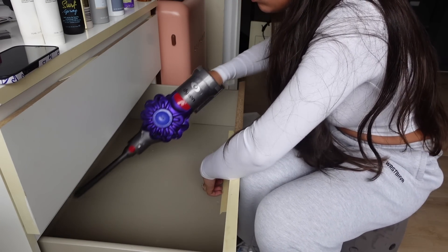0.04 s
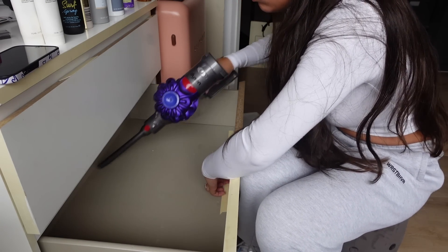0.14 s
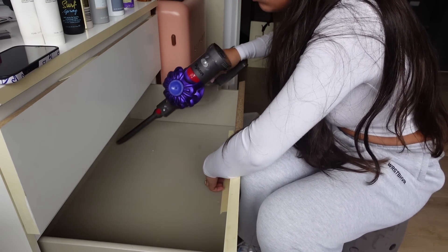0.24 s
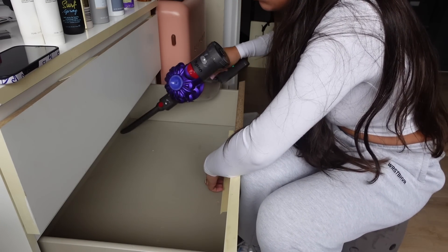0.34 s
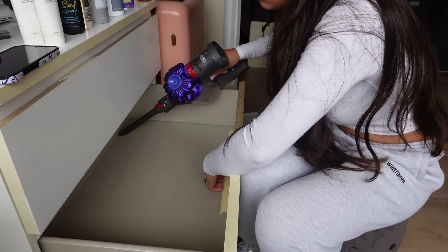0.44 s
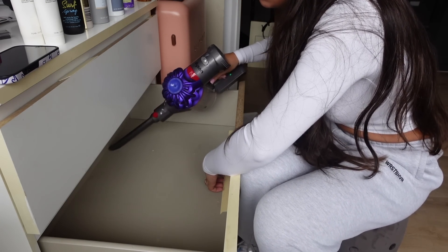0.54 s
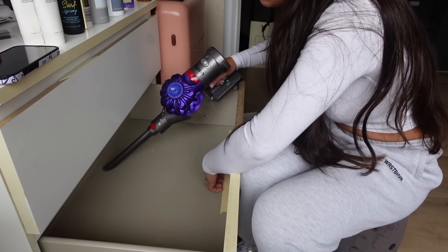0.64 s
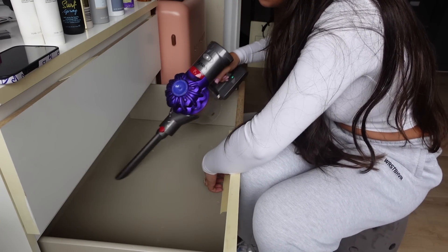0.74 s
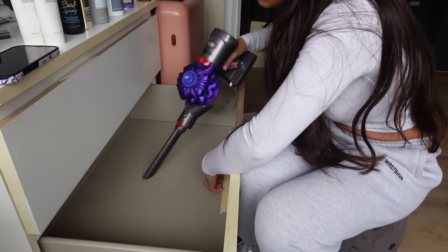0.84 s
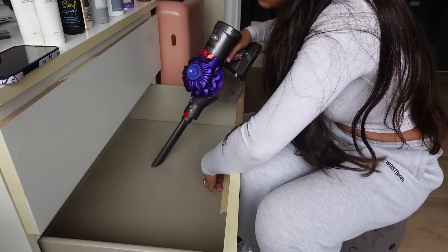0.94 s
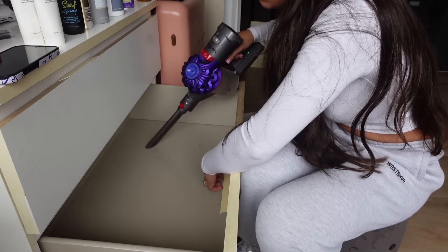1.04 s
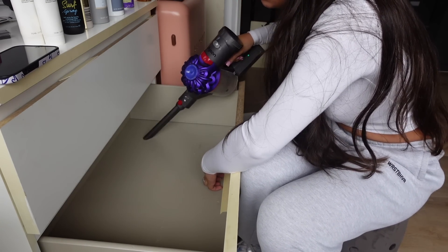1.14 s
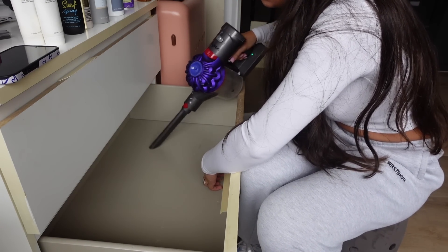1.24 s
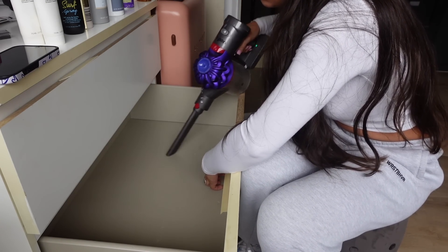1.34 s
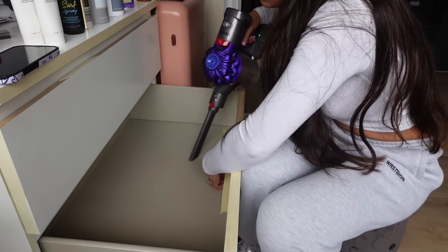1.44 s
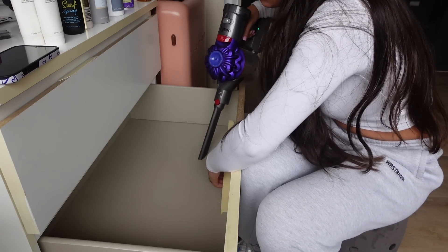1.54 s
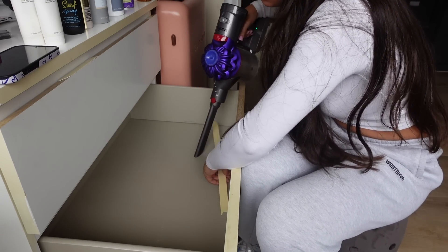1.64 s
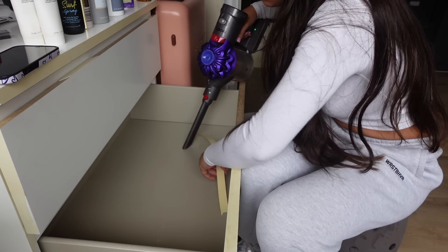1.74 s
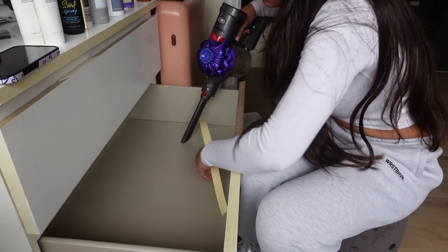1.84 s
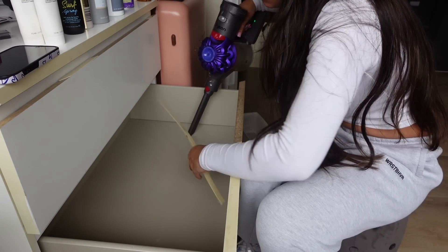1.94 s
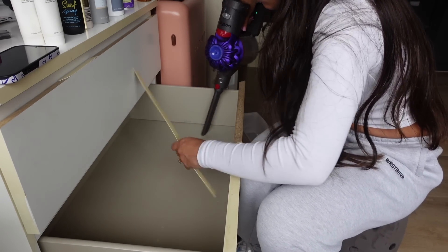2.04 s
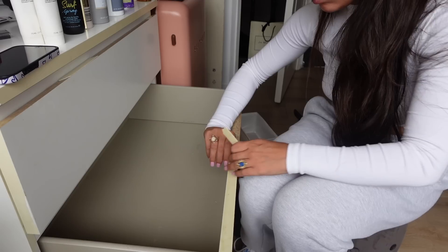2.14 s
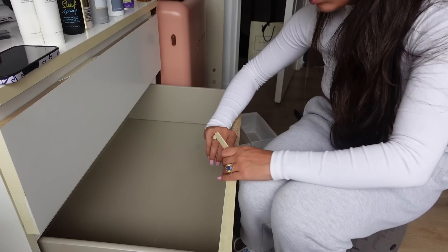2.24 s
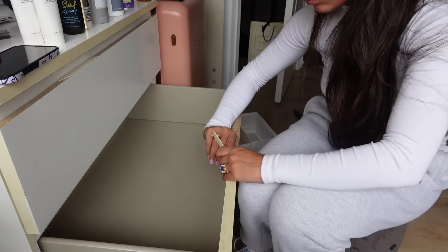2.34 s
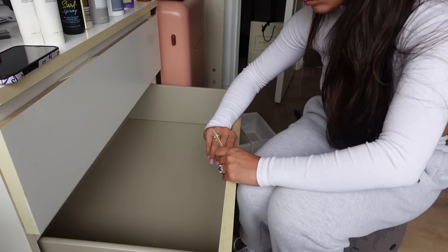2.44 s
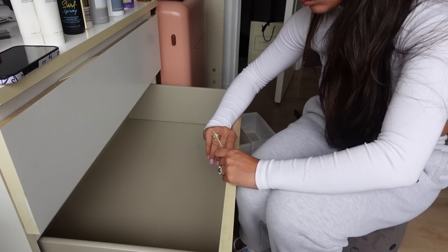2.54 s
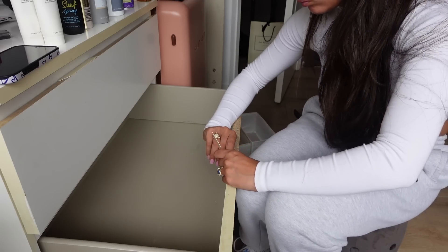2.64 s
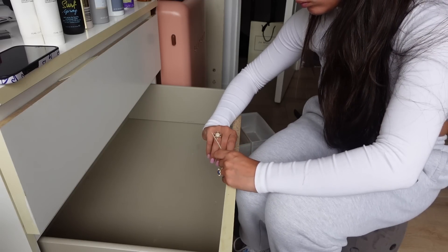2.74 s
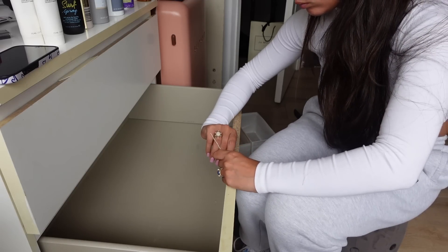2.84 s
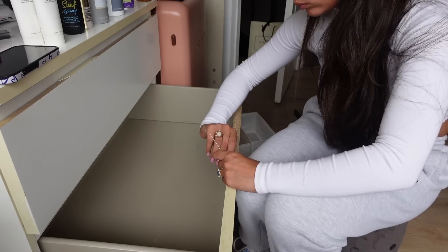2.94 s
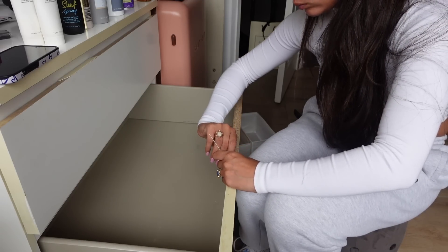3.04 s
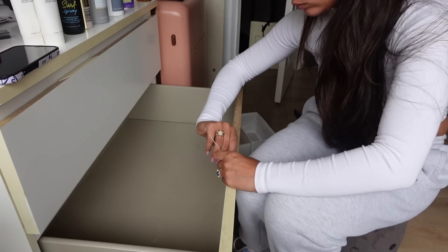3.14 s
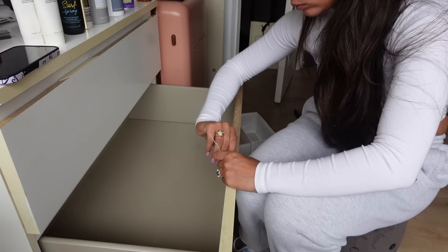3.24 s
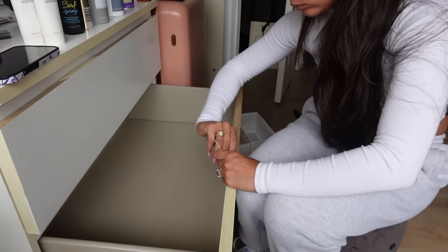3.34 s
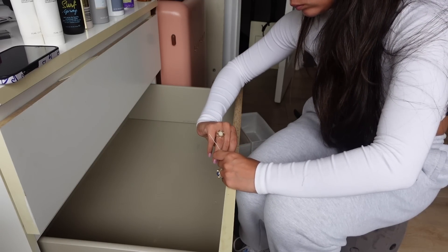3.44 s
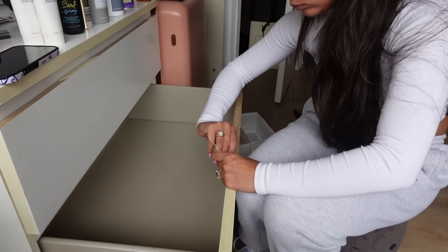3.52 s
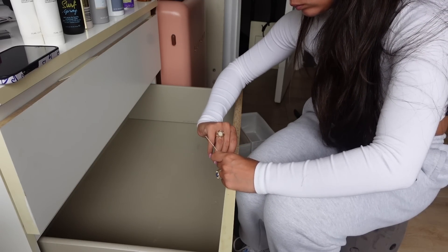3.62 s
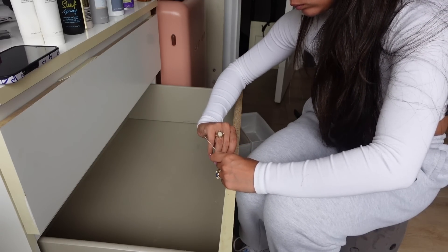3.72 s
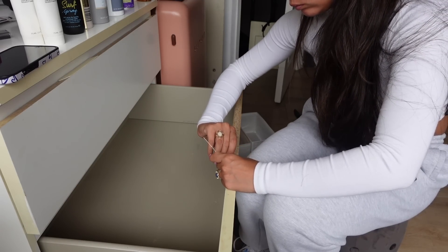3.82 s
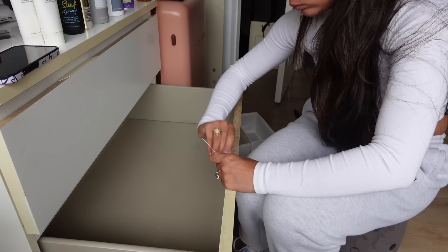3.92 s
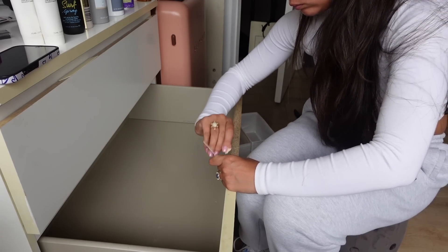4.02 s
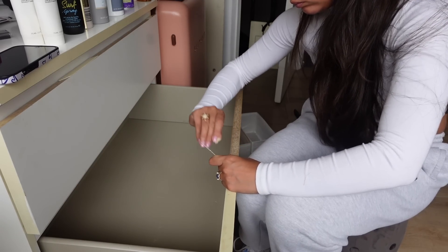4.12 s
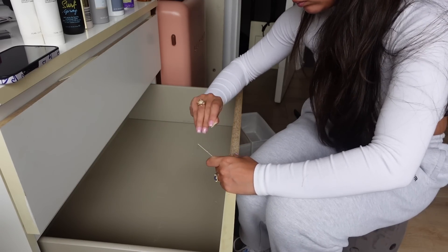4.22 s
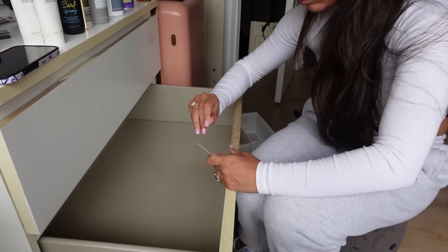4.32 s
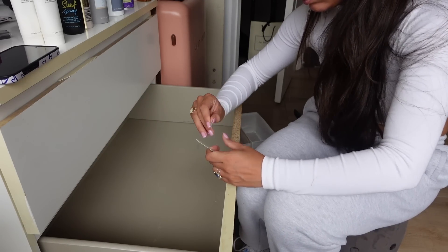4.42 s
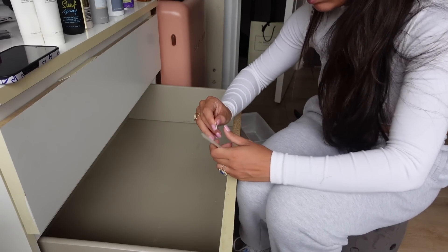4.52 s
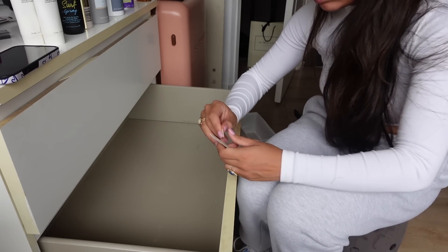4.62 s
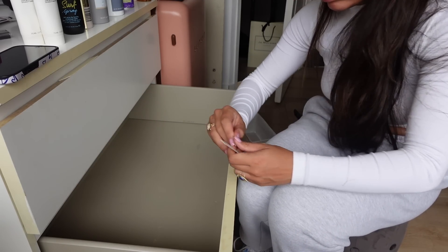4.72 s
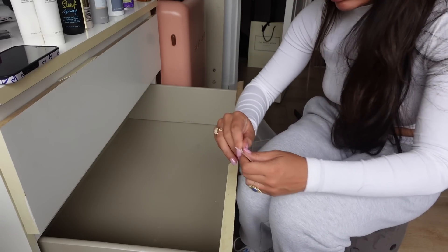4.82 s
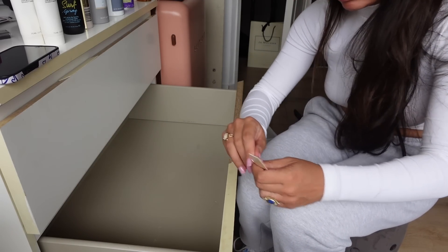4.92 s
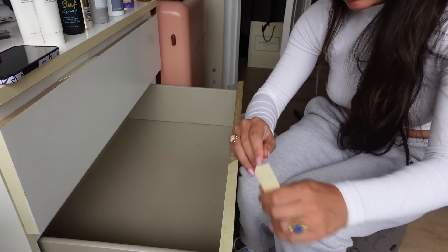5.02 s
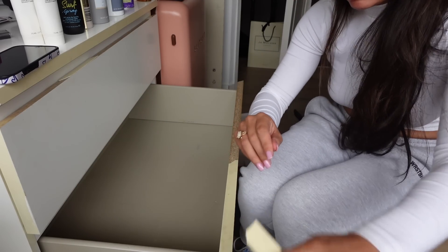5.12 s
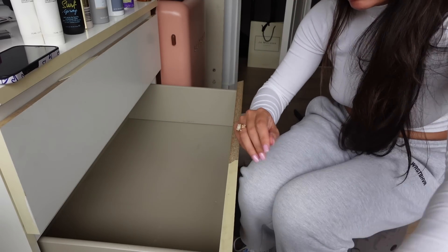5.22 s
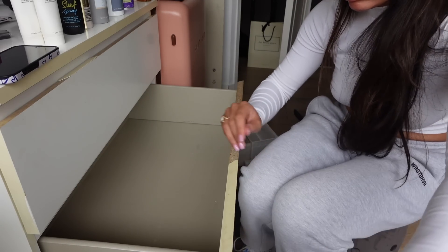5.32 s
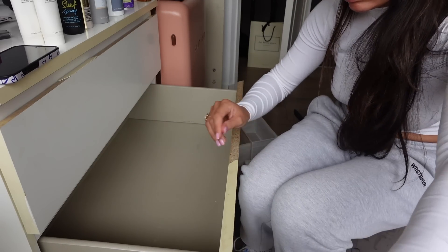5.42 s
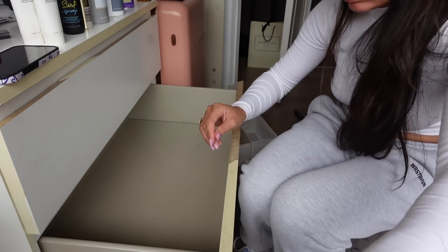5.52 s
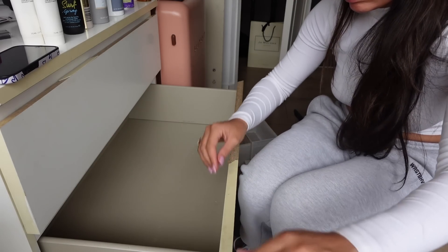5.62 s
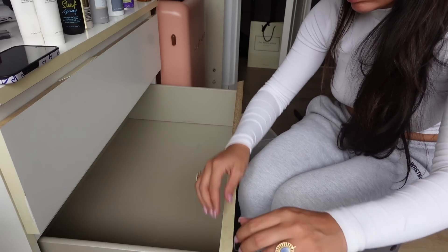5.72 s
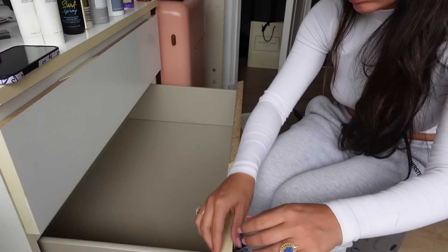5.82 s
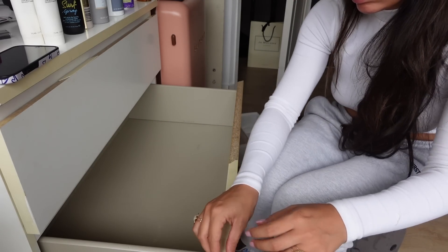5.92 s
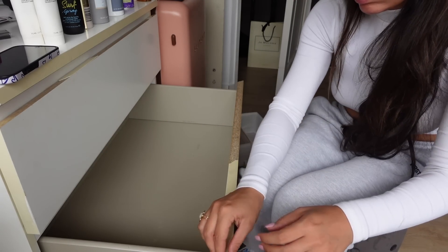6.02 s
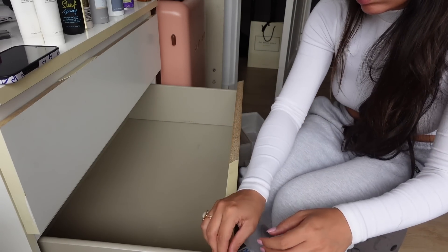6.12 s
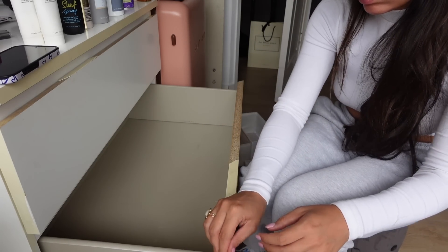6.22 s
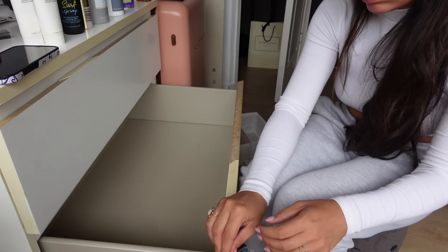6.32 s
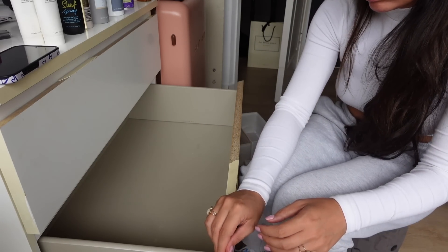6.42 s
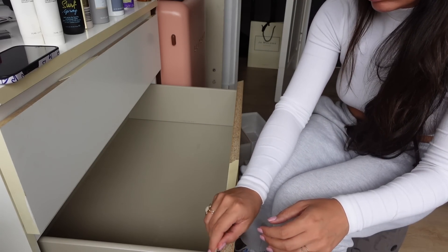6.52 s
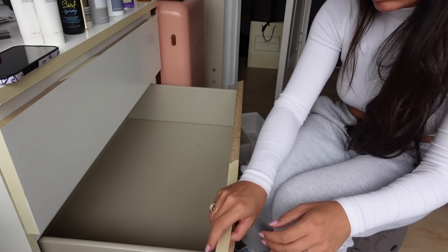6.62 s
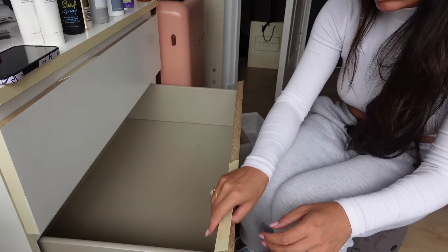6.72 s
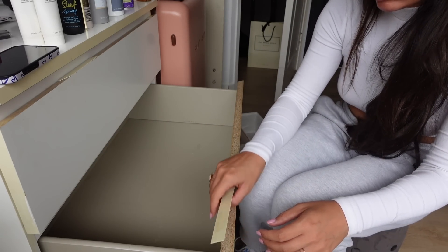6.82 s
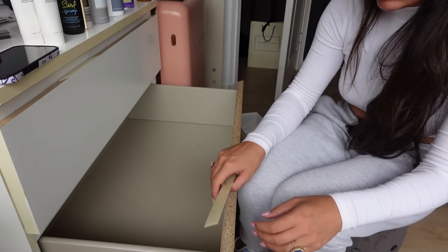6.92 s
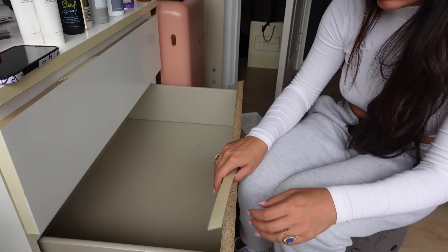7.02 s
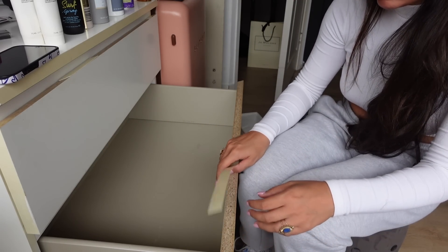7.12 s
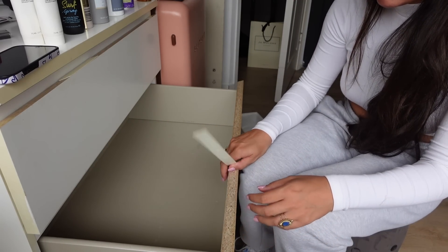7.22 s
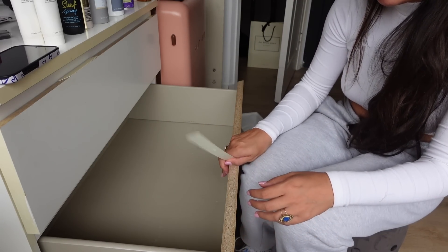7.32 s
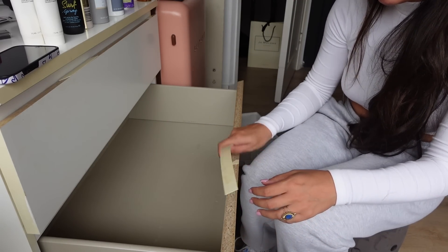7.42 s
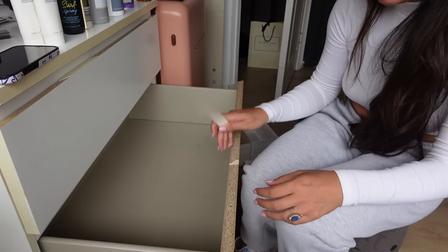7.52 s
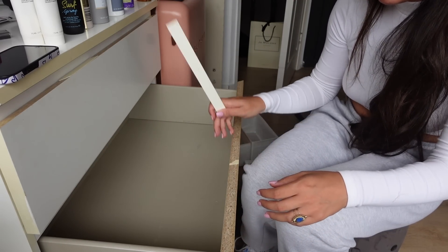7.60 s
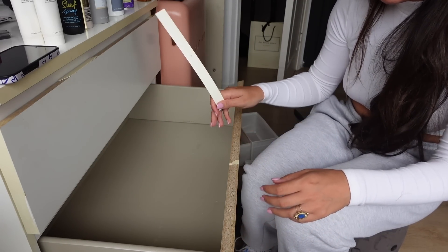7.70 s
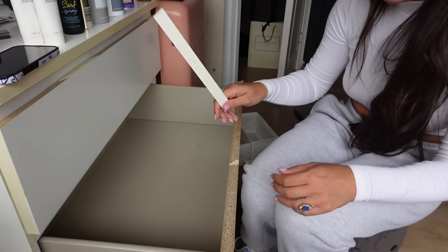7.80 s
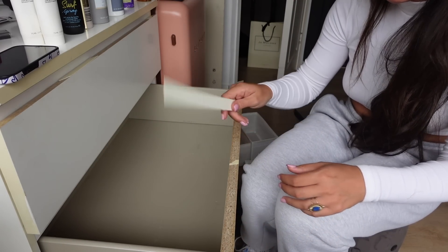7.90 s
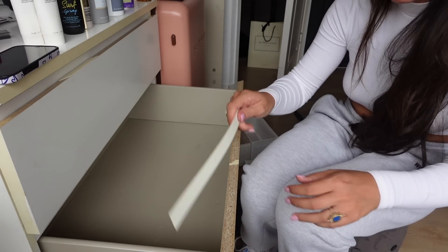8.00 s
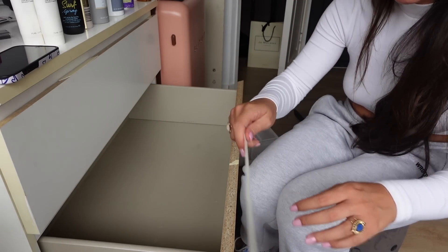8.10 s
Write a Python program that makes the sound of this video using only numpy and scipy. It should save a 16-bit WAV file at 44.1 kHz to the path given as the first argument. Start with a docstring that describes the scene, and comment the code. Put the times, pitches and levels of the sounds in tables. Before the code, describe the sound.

In a small room, a cordless vacuum runs loudly inside a drawer, rushing air under a high motor whine, with a few dull nozzle bumps. It cuts off abruptly after two seconds, leaving a soft hum. Close by, fingernails tap and pick at a plastic edge strip, the glue ticking until it snaps. Hands tap the board and sleeves rustle, then a second length peels with a brief hiss and rips free with sharp cracks.

```python
"""In a small, softly humming room, a cordless vacuum cleaner sweeps a drawer with its crevice nozzle. Its fast
motor whines over turbulent air that excites the ducts' resonances; its sound ends abruptly at 2.1 s. Then
fingernails pick at the drawer's plastic edge strip: the glue ticks, the strip snaps, hands tap and rub the
board, and a second length peels with a hiss and rips free. Each impact or slip is a force filtered by the body
it excites, then reflected by the drawer and the room."""
import sys
import numpy as np
from scipy import signal
from scipy.fft import rfft, irfft, next_fast_len
from scipy.io import wavfile
from scipy.ndimage import map_coordinates

SR = 44100
rng = np.random.default_rng(int(sys.argv[2]) if len(sys.argv) > 2 else 0)


def put_to_file(sound):
    """Save the sound as 16-bit audio at rate SR, in the file named by the first command-line argument."""
    columns = np.atleast_2d(sound).T  # one column per channel
    safe = np.clip(columns, -1, 1)
    whole_steps = np.round(safe * 32767)
    wavfile.write(sys.argv[1], SR, whole_steps.astype(np.int16))


N = 359856
TIME = np.arange(N) / SR

# Resonances of the wand and bin. Each row: centre in Hz, width in Hz, gain in dB.
DUCT_MODES = [(376, 20, 1), (572, 23, 7.5), (790, 32, 9), (1049.4, 130, 9.5), (2420, 90, 0.5),
              (2760, 65, 3.5), (4190, 610, 2.5), (6280, 330, 3.5), (8000, 400, 3)]
# Stereo width of the background. Each row: frequency in Hz, side level in dB.
BACKGROUND_WIDTH = [(100, -3.5), (4500, -7), (15000, -22)]


def vacuum(cut_s=2.1, bump_t60=.5):
    """Resonance: turbulent air excites the ducts and nozzle gap; bumps make the drawer boom."""
    # Spectra of air stream, drawer boom and bottom panel. Each row: frequency in Hz, relative dB.
    air_spectrum = [(290, -43.5), (500, -11.5), (800, -10.5), (1050, -15), (1500, -5), (2360, 0.5),
                    (3200, -2), (6500, -7), (8200, -9.5), (9600, -15), (10800, -8), (12500, -15.5),
                    (14500, -21), (16000, -27)]
    boom_spectrum = [(25, -35), (110, -33), (145, -11), (180, -22.5), (205, 1), (310, -0.5), (365, 4.5),
                     (470, -5), (800, -21), (2000, -59)]
    panel_spectrum = [(25, -20), (100, -12), (145, 2), (175, -11.5), (210, -4.5), (400, -11), (2000, -64)]
    # Stereo width. Each row: frequency in Hz, side level in dB.
    width = [(60, -31.5), (110, -27), (200, -17), (380, -19), (700, -21.5), (1290, -34), (2380, -28.5),
             (4400, -36.5), (8120, -32), (15000, -19.5)]
    # Resonances of the nozzle's gap to the board and of the hollow between nozzle and drawer wall.
    # Each row: time in seconds, centre in Hz, level in dB.
    gap_path = [(0, 2260, -22.5), (.47, 2380, -18), (.82, 2500, -24.5), (1.0, 2482, -18),
                (1.15, 2580, -23.5), (1.28, 2520, -18.5), (1.52, 2230, -22.5), (1.68, 2450, -25),
                (1.81, 1980, -15.5), (2.08, 2550, -26.5)]
    hollow_path = [(0, 1000, -25), (.33, 1400, -21), (.46, 1490, -31.5), (.6, 1250, -23.5),
                   (.87, 1350, -31.5), (1.1, 1380, -22.5), (1.25, 1350, -29), (1.83, 1550, -23.5),
                   (1.96, 1398, -36.5), (2.08, 1300, -22)]
    # The nozzle strikes the board. Each row: start in seconds, level in dB.
    bumps = [(.003, -38), (.41, -43), (1.03, -54), (1.3, -47), (1.39, -49), (1.86, -47.5)]
    air = amp(-14.5 + .63 * wobble(25)) * noise(air_spectrum, width, lambda hz: peaks(DUCT_MODES, hz))
    gap = gap_resonance(gap_path, octaves=.19, waver_db=1.96)
    hollow = gap_resonance(hollow_path, octaves=.32, waver_db=1.5)
    shake = sum(amp(db - 60 * np.abs(TIME - s) / bump_t60) * (TIME > s) for s, db in bumps)
    steady_boom = amp(-35 + 1.4 * wobble(5.4))
    boom = np.hypot(steady_boom, amp(13) * shake) * noise(boom_spectrum, width)  # powers add
    thump = shake * noise(panel_spectrum, width)
    sounding = np.clip((cut_s - TIME) * SR / 64, 0, 1)
    return (air + gap + hollow + boom + thump + motor()) * sounding


def motor(blades=7, base_blade_hz=11790):
    """Rotation gives shaft harmonics, a blade-passing tone and rough, inharmonic bearing tones."""
    # The machine turns toward and away. Each row: time in seconds, blade, bearing, shaft level in dB.
    levels = [(0, -25.5, -28.5, -27.5), (.19, -29.5, -29.5, -25), (.48, -23.5, -32.5, -29),
              (.6, -23.5, -28, -38), (.85, -26, -22.5, -35.5), (1.13, -23.5, -26.5, -37.5),
              (1.3, -28.5, -33.5, -36.5), (1.55, -22.5, -29, -38), (1.83, -26, -28, -29),
              (2.08, -30.5, -25.5, -32)]
    # A partly blocked nozzle speeds the motor up.
    # Each row: centre in seconds, width in seconds, rise of the blade tone in Hz.
    surges = [(1.0, .11, 65), (1.66, .14, 30)]
    # Shaft overtones. Each row: multiple of the shaft speed, level in dB.
    harmonics = [(2, -35.5), (3, -34.5), (4, -34.5)]
    # Bearing tones. Each row: multiple of the shaft speed, relative dB, phase jitter in radians.
    bearing_tones = [(6.53, 0, .5), (6.36, -6, 1.5)]

    def tone(phase, flutter_db=2.5):
        """Amplitude modulation: a sine flutters as the machine moves."""
        return unit(np.sin(phase) * amp(flutter_db * wobble(26)))

    blade_db, bearing_db, shaft_db = curves(levels)
    surge_hz = sum(rise * np.exp(-.5 * ((TIME - s) / width) ** 2) for s, width, rise in surges)
    blade_hz = base_blade_hz + surge_hz + 6 * wobble(40)
    angle = 2 * np.pi * np.cumsum(blade_hz) / blades / SR
    shaft = amp(shaft_db) * tone(angle + .5 * wobble(25))
    overtones = sum(amp(db) * tone(k * angle) for k, db in harmonics)
    bearing = sum(amp(db) * tone(k * angle + jitter * wobble(120), flutter_db=4.5)
                  for k, db, jitter in bearing_tones)
    return shaft + overtones + amp(bearing_db) * bearing + amp(blade_db) * tone(blades * angle)


def gap_resonance(path, octaves, waver_db):
    """An air gap's resonance selects a band of noise; it wavers with the hand and passes the ducts."""
    centre_hz, db = curves(path)
    gain = amp(db + waver_db * wobble(14))
    centre_hz = centre_hz * 2 ** (.064 * wobble(14))
    hz, t, white = signal.stft(rng.standard_normal(N), SR, nperseg=2048)
    band = bell(hz[:, None], np.interp(t, TIME, centre_hz), octaves)
    ducts = amp(peaks(DUCT_MODES, hz))[:, None]
    return gain * unit(signal.istft(white * band * ducts, SR, nperseg=2048)[1][:N])


def edge_strip():
    """Fracture: the glue gives way in single cracks, and in rips where a crack runs along it."""
    # Each row: start in seconds, strength in dB, ring in Hz.
    cracks = [(3.0986, -29.5, 7390), (3.1213, -23.5, 6500), (3.1646, -14, 9740), (3.3257, -28.5, 7830),
              (3.4066, -26, 7770), (3.4296, -16, 7920), (3.5433, -24, 7680), (3.6677, -20.5, 8000),
              (3.6889, -22.5, 7000), (3.736, -12.5, 7750), (3.8163, -28, 7360), (3.9505, -6.5, 6340),
              (3.9591, 2, 4350), (4.0248, -10, 4924), (5.4517, -20, 3824), (5.5785, -24.5, 4150),
              (7.1633, 3, 5346), (7.2195, 0, 9130), (7.2924, 6.5, 9380), (7.3136, 6, 6740),
              (7.7188, -29, 4240), (8.0606, -34.5, 4530)]
    # Each row: start and length in seconds, strength in dB, ring in Hz, knock and treble gain in dB.
    rips = [(3.954, .0033, -26, 4500, -4, 0), (3.959, .04, -27.5, 3420, -9, -9.5),
            (4.029, .014, -35, 3490, -6.5, -8.5), (7.293, 0.023, -23, 4820, -16, 2.5),
            (7.312, .059, -25.5, 5570, -20.5, 1.5)]
    out = np.zeros((2, N))
    for s, db, ring_hz in cracks:
        force = contact(t60=.0098, chatter=.61)
        # Harder cracks free the strip, so the board's share falls; they are also brighter.
        crack = strip_response(force, ring_hz, knock_db=-30 - .4 * db, treble_db=-2.5 + .12 * db)
        add(out, s, amp(db) * in_room(crack, wet_db=-2))
    t = np.arange(SR // 8) / SR
    for s, length, db, ring_hz, knock_db, treble_db in rips:
        force = slips(len(t), spiky_db=2) * np.clip(2 * (1 - t / length), 0, 1)
        rip = strip_response(force, ring_hz, knock_db, treble_db)
        add(out, s, amp(db) * np.sqrt(length * SR) * in_room(rip, wet_db=-2.5, drawer_db=-6))
    return out * amp([[.25], [-.25]])  # slightly to the left


def strip_response(force, ring_hz, knock_db, treble_db):
    """Forced vibration: the free length of strip rings broadly and knocks the board it hangs on."""
    # Responses of strip and board. Each row: frequency in Hz, relative dB.
    strip = [(40, -56), (200, -30.5), (1400, -27), (2500, -3), (3300, -5), (5000, 1), (9500, -1.5),
             (13000, -4), (16000, -7.5)]
    board = [(25, -40), (80, -16.5), (230, 2), (450, -2), (750, -1), (1050, 3), (1450, 1), (1900, 5.5),
             (3000, -17.5), (8000, -34), (16000, -49)]
    colour = lambda hz: 8 * bell(hz, ring_hz, octaves=.25) + treble_db * bell(hz, 15000, octaves=.54)
    return coloured(force, strip, colour) + amp(knock_db) * coloured(force, board)


def taps():
    """Impact: a hard nail or ring clicks, and the soft finger behind it thuds on the board."""
    # Each row: start in seconds, strength in dB, resonance in Hz, relative thud in dB.
    strikes = [(2.455, -20, 2780, 0), (2.484, -32.5, 956, -2), (2.612, -26.5, 1940, -26),
               (2.817, -33.5, 1800, -26), (4.096, -22, 619, -4), (4.15, -26, 1910, -20),
               (4.222, -25.5, 2530, -21.5), (5.415, -33.5, 2420, -24), (5.839, -17.5, 920, -30.5),
               (6.049, -33, 2220, -30), (6.27, -24.5, 1710, -24), (6.285, -23, 1710, -25),
               (6.425, -26, 1670, -23.5), (7.555, -31.5, 864, -17)]
    # Spectra of nail and finger impacts. Each row: frequency in Hz, relative dB.
    nail = [(40, -20), (150, -6.5), (500, -5), (950, -0.5), (1800, -1), (3200, -6.5), (6000, -12.5),
            (10000, -23.5), (16000, -30.5)]
    finger = [(60, -49), (150, -10), (240, 1.5), (400, -9), (700, -14), (2000, -41)]
    out = np.zeros((2, N))
    for s, db, ring_hz, thud_db in strikes:
        force = contact(t60=.013, chatter=.83)
        click = coloured(force, nail, lambda hz: 7.2 * bell(hz, ring_hz, octaves=.16))
        thud = amp(thud_db) * coloured(force, finger)
        add(out, s, amp(db) * in_room(click + thud, wet_db=4.5, drawer_db=.5))
    return out


def sleeves():
    """Sliding friction: cloth rubs in strokes that swell quickly and fade slowly."""
    # Each row: start in seconds, length in seconds, level in dB.
    strokes = [(2.55, .4, -74), (4.25, .45, -65.5), (5.3, 0.51, -57), (6.55, .5, -55), (7.4, .85, -64.5)]
    # Spectrum of rubbed cloth. Each row: frequency in Hz, relative dB.
    cloth = [(710, -46), (1200, -15.5), (1570, -1), (2040, -3), (2790, -2), (3080, -6.5), (5300, -4),
             (16000, -22.5)]
    gain = sum(amp(db) * swell(s, .25 * length, s + length, .75 * length) for s, length, db in strokes)
    return friction(gain, cloth, spiky_db=3, uneven_db=3)


def palm(start_s=5.845, length_s=.14, fall_db_per_s=101):
    """Friction noise decays as a palm lands on the board and slows to rest."""
    # Spectrum of skin on the board. Each row: frequency in Hz, relative dB.
    skin = [(120, -52), (200, -40), (353, -9), (646, -18), (719, -2.5), (875, -12), (922, 2), (1010, -8.5),
            (3440, -12.5), (14000, -39)]
    slowing = amp(-43 - fall_db_per_s * np.abs(TIME - start_s))
    touching = swell(start_s, .012, start_s + length_s, .02)
    return friction(slowing * touching, skin, spiky_db=0, uneven_db=4)


def peel(rise_s=.25):
    """Adhesive failure: as the pull on the strip builds, tiny breaks in the glue merge into a hiss."""
    # Each row: start in seconds, end in seconds, level in dB.
    pulls = [(3.05, 3.2, -52.5), (3.277, 3.8, -65), (6.784, 7.29, -49)]
    # Spectrum of parting glue. Each row: frequency in Hz, relative dB.
    glue = [(710, -48.5), (1200, -13.5), (1570, -6.5), (2110, -12), (2480, -6), (4550, -2), (4960, -2.5),
            (14200, -8), (16000, -11.5)]
    gain = sum(amp(db) * swell(start, rise_s, end, .015) for start, end, db in pulls)
    return friction(gain, glue, spiky_db=.5, uneven_db=0)


def in_room(x, wet_db, drawer_db=-3, drawer_t60=.12):
    """Reverberation: direct sound, drawer echoes, a flutter between its walls and the room's tail."""
    # The room's decay. Each row: frequency in Hz, reverberation time in seconds.
    decay_times = [(200, 0.21), (1400, 0.27), (4000, .28), (10000, 0.23), (16000, .17)]
    # Reflections in the drawer. Each row: mean delay in seconds, gain as a factor.
    echoes = [(.0017, 0.21), (.0034, .5), (.0055, .3)]
    # Stereo width of the diffuse sound. Each row: frequency in Hz, side level in dB.
    width = [(200, -11), (1200, -12), (2400, -26), (16000, -28)]
    hz, t, white = signal.stft(rng.standard_normal((2, SR // 2)), SR, nperseg=256)
    decay = amp(-60 * t / along(decay_times, hz)[:, None])
    onset = 1 - np.exp(-t / .002)
    tail = signal.istft(white * decay * onset, SR, nperseg=256)[1]
    tail *= amp(wet_db) / np.linalg.norm(tail[0])
    flutter = rng.standard_normal(tail.shape) * amp(-60 * TIME[:tail.shape[1]] / drawer_t60)
    flutter *= amp(drawer_db) / np.linalg.norm(flutter[0])
    response = spread(tail + flutter, width)
    response[:, 0] += 1  # direct path
    for delay, gain in echoes:
        response[:, int(delay * SR * rng.uniform(.85, 1.15))] += gain
    return signal.fftconvolve(x[None], response, axes=1)


def room_hum():
    """Resonances in steady broadband noise are heard as a soft hum."""
    # The room's noise. Each row: frequency in Hz, relative dB.
    spectrum = [(25, -36.5), (60, -23), (160, -3.5), (240, -1), (450, -6.5), (630, -3.5), (800, -9),
                (1100, -3.5), (1400, -11.5), (1800, -5), (2480, -13.5), (5000, -19.5), (10000, -23),
                (16000, -26)]
    # Its resonances. Each row: centre in Hz, width in Hz, gain in dB.
    modes = [(616, 55, -0.5), (1950, 110, 1.5), (5450, 500, 4.5)]
    return amp(-58.5) * noise(spectrum, BACKGROUND_WIDTH, lambda hz: peaks(modes, hz))


def fan():
    """Narrow-band noise: a faint whirr, placed on the left by a level difference."""
    # Each row: frequency in Hz, relative dB.
    whirr = [(700, -41.5), (1040, -12.5), (1130, 5), (1220, -14.5), (1700, -40)]
    return amp([[-65], [-76]]) * noise(whirr, BACKGROUND_WIDTH)


def contact(t60, chatter):
    """An impulsive force, followed by a brief chatter of the surfaces."""
    t = np.arange(SR // 12) / SR
    force = rng.standard_normal(len(t)) * amp(-60 * t / t60)
    force *= chatter / np.linalg.norm(force)
    force[0] += 1
    return force


def slips(n, spiky_db):
    """A random force of dense tiny slips, more unequal as spiky_db grows."""
    return rng.standard_normal(n) * amp(spiky_db * np.minimum(rng.exponential(size=n), 5))


def friction(gain, spectrum, spiky_db, uneven_db):
    """Stick-slip noise, filtered by the surface, modulated by pressure and heard in the room."""
    hiss = unit(coloured(slips(N, spiky_db), spectrum))
    pressure = amp(uneven_db * wobble(45))
    return in_room(hiss * gain * pressure, wet_db=-7)[:, :N]


def noise(spectrum, width, extra_db=lambda hz: 0):
    """Filtered stereo noise of rms 1."""
    return unit(spread(coloured(rng.standard_normal((2, N)), spectrum, extra_db), width))


def coloured(x, spectrum, extra_db=lambda hz: 0):
    """Minimum-phase filtering by a spectrum plus extra_db; the result has energy 1."""
    n = x.shape[-1]
    m = 2 * next_fast_len(n // 2 + 2048)
    hz = np.fft.rfftfreq(m, 1 / SR)
    cepstrum = irfft(np.log(amp(along(spectrum, hz) + extra_db(hz))))
    cepstrum[1:m // 2] *= 2  # folding onto positive time makes the filter causal
    cepstrum[m // 2 + 1:] = 0
    y = irfft(rfft(x, m) * np.exp(rfft(cepstrum)))[..., :n]
    return y / np.sqrt(np.mean(np.sum(y ** 2, axis=-1)))


def spread(pair, width):
    """Mid-side stereo from two unrelated signals, the side filtered by width."""
    n = pair.shape[1]
    m = next_fast_len(n)
    side_gain = amp(along(width, np.fft.rfftfreq(m, 1 / SR)))
    side = irfft(rfft(pair[1], m) * side_gain, m)[:n]
    return np.array([pair[0] + side, pair[0] - side])


def peaks(modes, hz):
    """Gain in dB of Lorentzian resonance peaks."""
    return sum(db / (1 + (2 * (hz - centre) / width) ** 2) for centre, width, db in modes)


def bell(hz, centre_hz, octaves):
    """A Gaussian of height 1 on the log-frequency axis."""
    return np.exp(-.5 * (np.log2((hz + 1) / centre_hz) / octaves) ** 2)


def along(points, hz):
    """Interpolation of (Hz, value) points on a log axis."""
    frequencies, values = np.transpose(points)
    return np.interp(np.log(hz + 1), np.log(frequencies + 1), values)


def curves(rows):
    """Interpolation of each column after the time to one value per sample."""
    times, *columns = np.transpose(rows)
    return [np.interp(TIME, times, column) for column in columns]


def swell(start, rise, end, fall):
    """A trapezoidal envelope, its times in seconds."""
    return np.clip((TIME - start) / rise, 0, 1) * np.clip((end - TIME) / fall, 0, 1)


def wobble(rate):
    """A smooth random curve with rate knots a second."""
    return map_coordinates(rng.standard_normal(int(N * rate / SR) + 4), [TIME * rate])


def amp(db):
    """Decibels to gain."""
    return 10 ** (np.asarray(db) / 20)


def unit(x):
    """Normalisation to rms 1."""
    return x / np.sqrt(np.mean(x ** 2) + 1e-20)


def add(out, start_s, x):
    """Superposition of x on out from start_s."""
    part = out[:, round(start_s * SR):][:, :x.shape[1]]
    part += x[:, :part.shape[1]]


def scene():
    """Superposition: the vacuum, the strip and the hands sound over a steady background."""
    background = room_hum() + fan()
    return vacuum() + edge_strip() + taps() + sleeves() + palm() + peel() + background


def record(dry, ceiling=.9, top_hz=15900):
    """Soft saturation rounds the highest peaks; a low-pass filter limits the band."""
    rounded = dry / (1 + np.abs(dry / ceiling) ** 8) ** (1 / 8)
    m = next_fast_len(N + SR // 2)
    passband = np.fft.rfftfreq(m, 1 / SR) < top_hz
    return irfft(rfft(rounded, m) * passband, m)[:, :N]


dry = scene()
out = record(dry)
put_to_file(out)
```